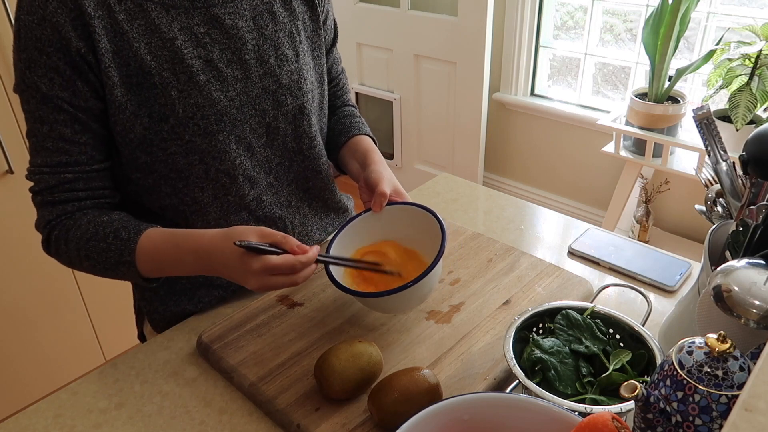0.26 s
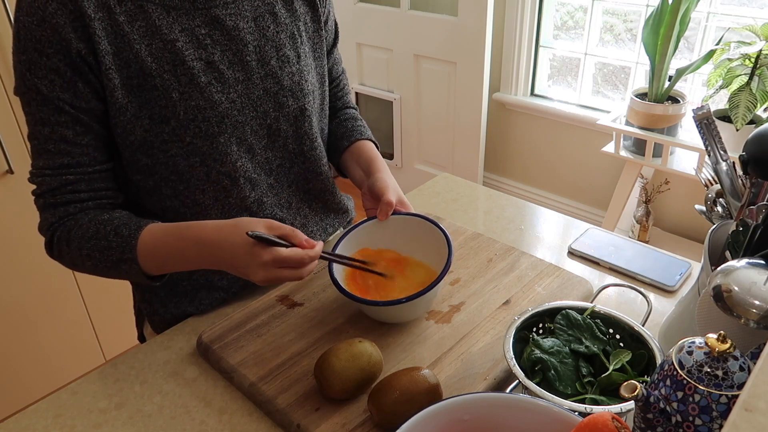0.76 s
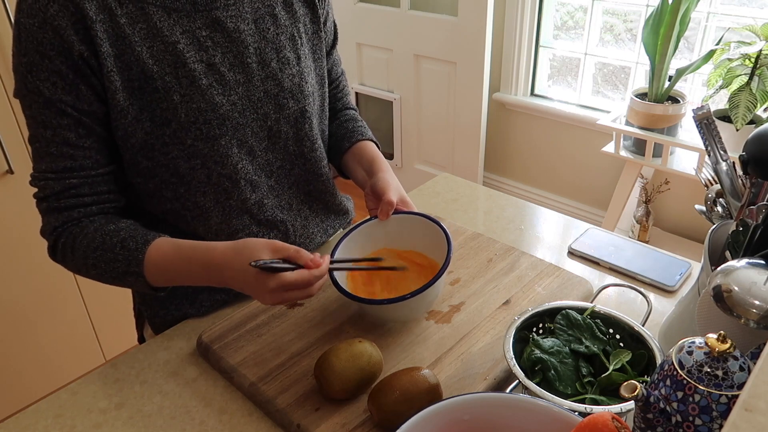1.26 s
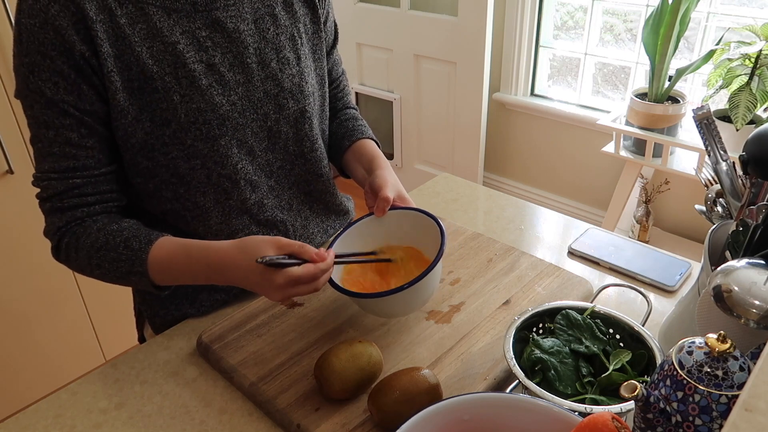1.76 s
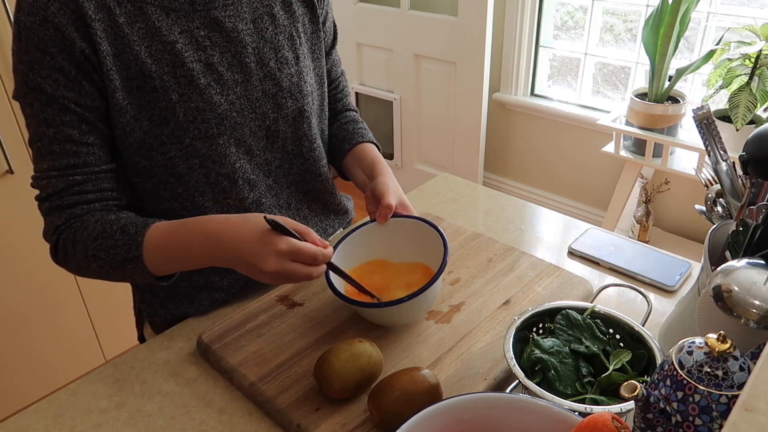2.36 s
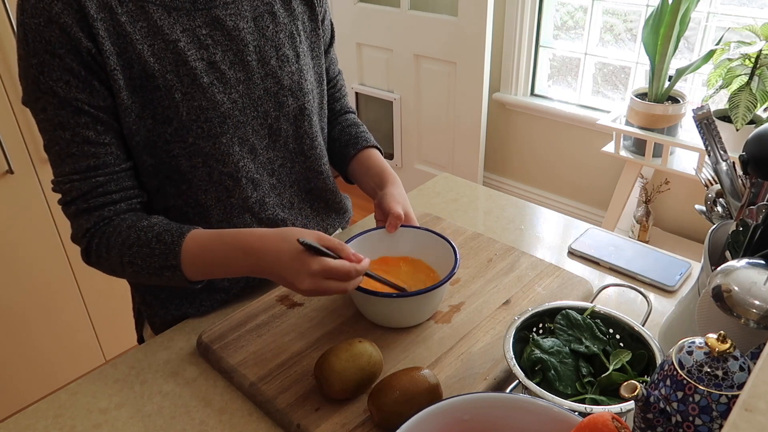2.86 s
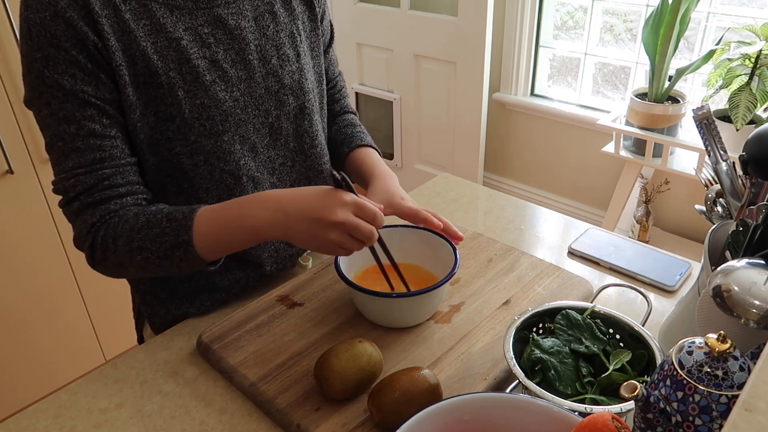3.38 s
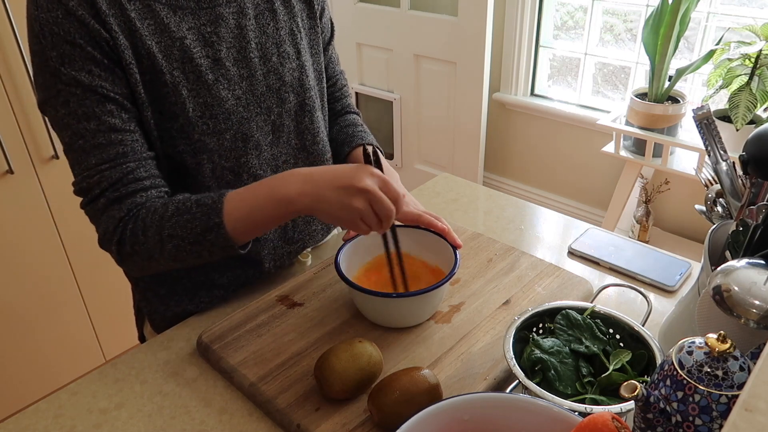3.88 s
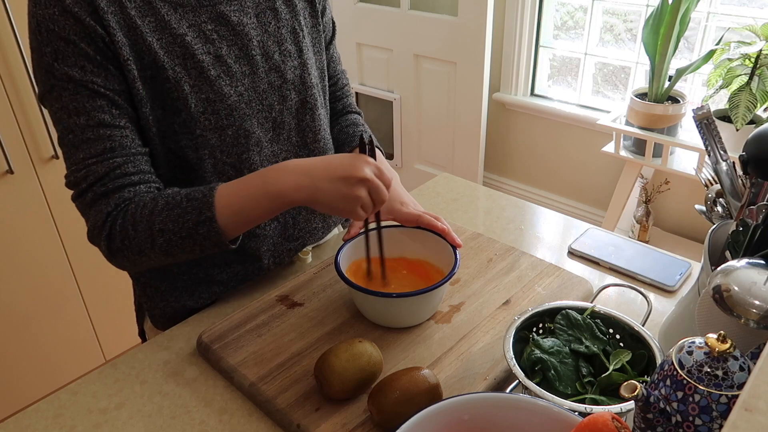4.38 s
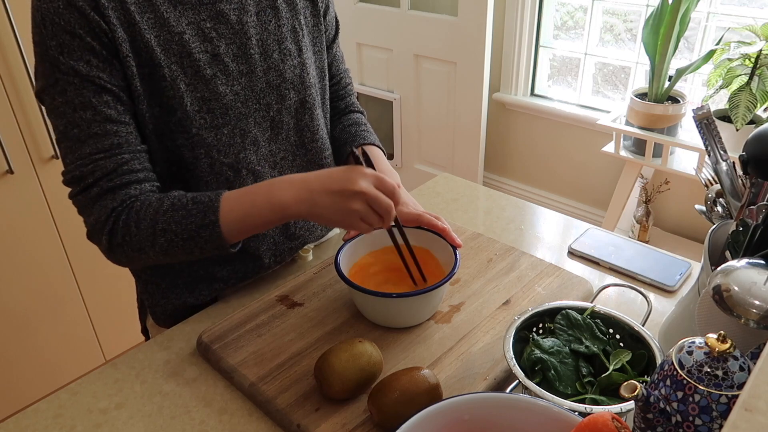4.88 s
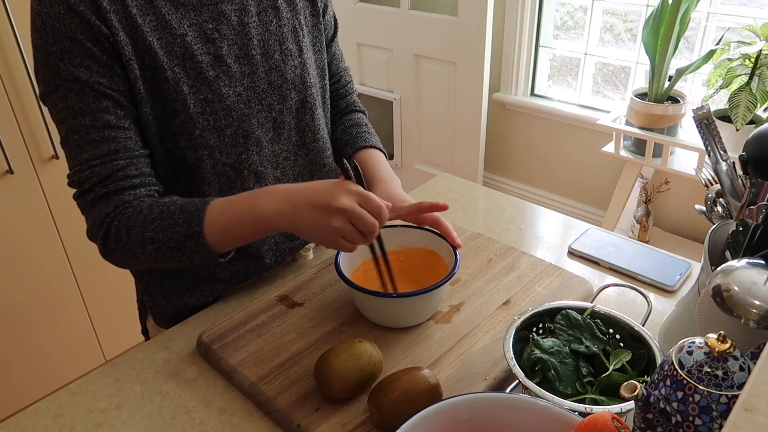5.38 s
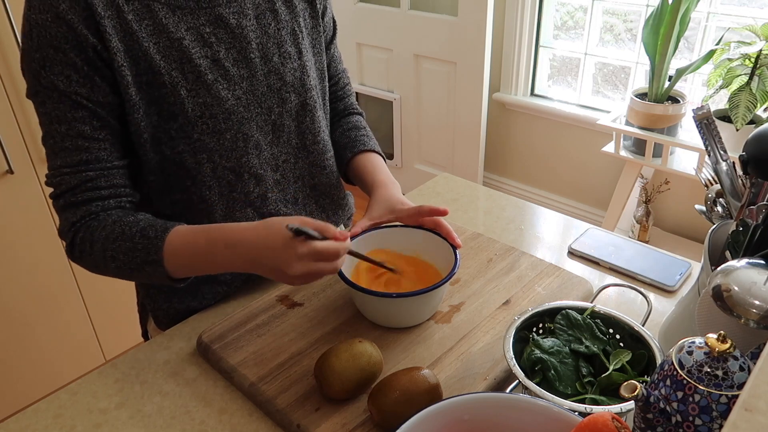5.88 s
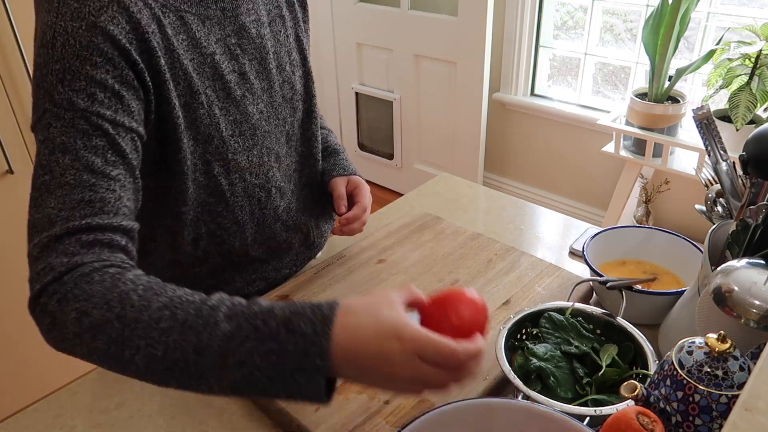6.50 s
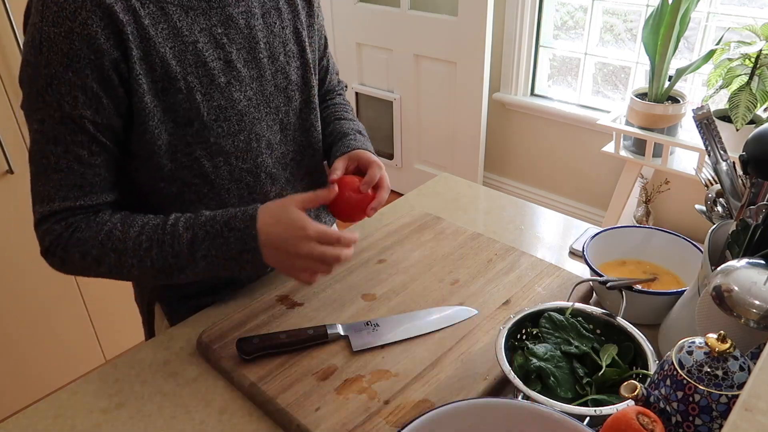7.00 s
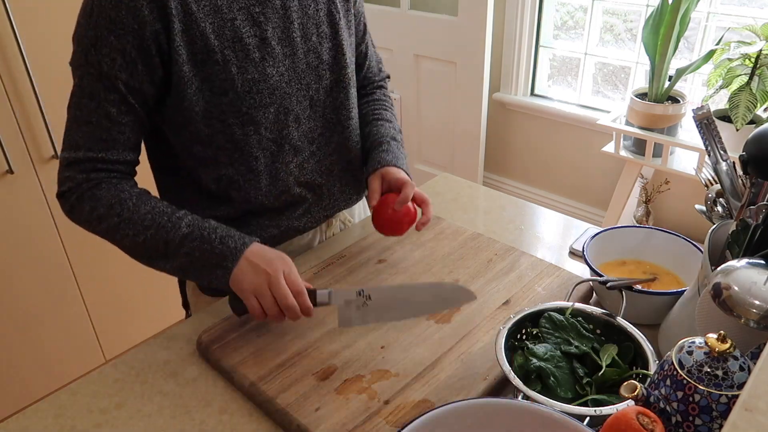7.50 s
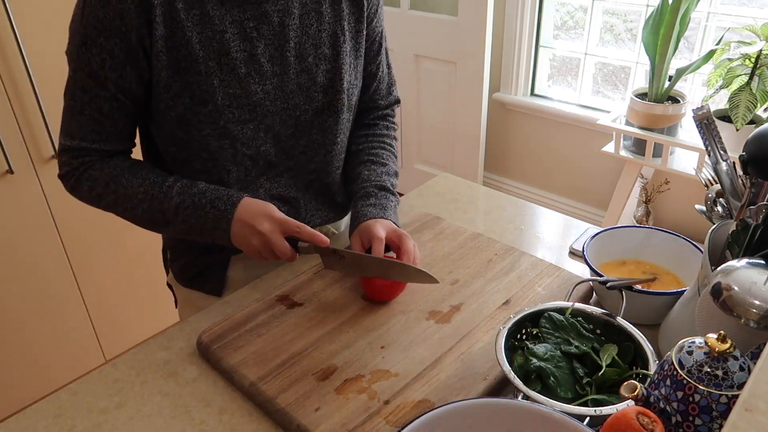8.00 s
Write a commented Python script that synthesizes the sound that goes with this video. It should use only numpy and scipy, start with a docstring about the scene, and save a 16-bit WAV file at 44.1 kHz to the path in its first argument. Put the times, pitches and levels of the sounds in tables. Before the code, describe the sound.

In a small kitchen with a low fridge hum, wooden chopsticks beat egg in an enamel bowl with quick sharp clicks and small wet plops. The bowl thuds hard on a wooden board and is set down; softer, wetter stirring follows. The sticks clatter on the rim, cut abruptly, then sleeves rustle, a knife handle bumps and a blade slides softly into a tomato. Close stereo microphone.

```python
"""A small kitchen: wooden chopsticks beat eggs in an enamel bowl, as struck modes with sharp ticks and plops.
The bowl thuds on a cutting board and is set down; the sticks scrape round in it, then are dropped on the rim.
The scene then jumps ahead: sleeves rustle, a knife is picked up and drawn into a tomato.
Sliding, egg and cloth are filtered grains and bubbles; noise and wavering tones make a fridge hum throughout."""
import sys
import numpy as np
from scipy import signal
from scipy.fft import rfft, irfft, next_fast_len
from scipy.io import wavfile
from scipy.ndimage import map_coordinates

SR = 44100
rng = np.random.default_rng(int(sys.argv[2]) if len(sys.argv) > 2 else 0)


def put_to_file(sound):
    """Save the sound as 16-bit audio at rate SR, in the file named by the first command-line argument."""
    columns = np.atleast_2d(sound).T  # one column per channel
    safe = np.clip(columns, -1, 1)
    whole_steps = np.round(safe * 32767)
    wavfile.write(sys.argv[1], SR, whole_steps.astype(np.int16))


N = 363825
T = np.arange(SR // 2) / SR  # seconds since a blow
CLOCK = np.arange(N) / SR  # seconds since the start
JUMP_S = 6.181  # the scene jumps from the eggs to the knife

# Bowl foot on board. Each row: start in seconds, level in dB, bright edge and low boom in relative dB.
KNOCKS = [(0.7536, -19, -35, -1), (0.789, -23, -6, -8), (1.1305, -3.5, -23, -15),
          (2.3416, -1.5, -15.5, -14.5), (2.4746, -1.5, -14, -12.5), (2.831, -21.5, -37, -2)]
# Spectrum of wood clacking. Each row: frequency in Hz, relative density in dB per Hz.
CLACK = [(100, -41), (280, -22), (520, -33.5), (900, -1.5), (1800, 2.5), (3200, 1), (4200, -14),
         (8000, -17), (16000, -41)]
# Spectrum of hard tips ticking. Each row: frequency in Hz, relative density in dB per Hz.
TICK = [(1000, -21), (3000, 2.5), (4800, 3), (6500, 5), (9500, -2), (12000, 3), (14500, -4), (16000, -29)]
# Spectrum of a thud on the board. Each row: frequency in Hz, relative density in dB per Hz.
THUD = [(20, -32), (60, -38), (170, -22), (350, -18.5), (520, 13), (720, 11.5), (1200, 4.5), (2000, -16.5),
        (4000, -56), (12000, -82)]
# Stereo width of sounds at the counter. Each row: frequency in Hz, side gain in dB.
WIDTH = [(30, -28), (160, -20), (300, -19), (650, -26), (1300, -23), (2800, -15), (5000, -3), (9000, 0),
         (15000, 1)]


def amp(db):
    """Decibels to gain."""
    return 10 ** (np.asarray(db) / 20)


def unit(x):
    """Scale to rms 1."""
    return x / np.sqrt(np.mean(x ** 2) + 1e-20)


def blow(x):
    """Scale a short sound to the energy of one millisecond at full level."""
    return x / np.sqrt(np.sum(x ** 2) * 1000 / SR)


def along(points, hz):
    """Interpolate (Hz, value) points on a log frequency axis."""
    f, v = np.transpose(points)
    return np.interp(np.log(hz + 1), np.log(f + 1), v)


def level(rows):
    """(s, dB) rows as a gain per sample, silent outside them."""
    return amp(np.interp(CLOCK, *np.transpose(rows), left=-120, right=-120))


def wobble(rate_hz):
    """A smooth random curve, rate_hz knots a second."""
    knots = rng.standard_normal(int(N * rate_hz / SR) + 4)
    return map_coordinates(knots, [CLOCK * rate_hz])


def swell(s, half_s):
    """A smooth rise and fall round time s, 1 at its top."""
    return np.exp(-((CLOCK - s) / half_s) ** 2)


def swells_of(rows):
    """Sum of swells from (middle s, dB, half length s) rows, as a gain per sample."""
    return sum(amp(db) * swell(s, half_s) for s, db, half_s in rows)


def filtered(x, response):
    """x times a response of frequency."""
    size = x.shape[-1]
    m = next_fast_len(size + 8192)
    hz = np.fft.rfftfreq(m, 1 / SR)
    return irfft(rfft(x, m) * response(hz), m)[..., :size]


def coloured(x, spectrum):
    """x filtered by the given spectrum, at rms 1."""
    return unit(filtered(x, lambda hz: amp(along(spectrum, hz))))


def spread(pair, width):
    """Two unrelated signals as mid and side become left and right; width sets the side gain by frequency."""
    side = filtered(pair[1], lambda hz: amp(along(width, hz)))
    return np.array([pair[0] + side, pair[0] - side])


def add(track, s, sound):
    """Mix a sound in at time s."""
    start = round(s * SR)
    track[:, start:start + len(T)] += sound[:, :N - start]


def late(x, s):
    """x delayed by s seconds."""
    return np.pad(x, (round(s * SR), 0))[:len(x)]


def pulse(spectrum):
    """One causal push with the given spectrum: minimum phase, by folding the cepstrum."""
    hz = np.fft.rfftfreq(len(T), 1 / SR)
    cepstrum = irfft(np.log(amp(along(spectrum, hz))))
    half = len(T) // 2
    cepstrum[1:half] *= 2
    cepstrum[half:] = 0
    return blow(irfft(np.exp(rfft(cepstrum))))


def ring(modes, scatter_db, detune):
    """Damped (Hz, dB, t60 s) modes whose strength and pitch vary at random from blow to blow."""
    hz, db, t60_s = np.transpose(modes)[:, :, None]
    size, shift = rng.standard_normal((2, len(modes), 1))
    sign = (-1) ** np.arange(len(modes))[:, None]
    fade = amp(db + scatter_db * size - 60 * T / t60_s)
    wave = np.sin(2 * np.pi * hz * (1 + detune * shift) * T)
    return blow(np.sum(sign * fade * wave, axis=0))


def chatter(x, t60_s, rough):
    """A contact is one sharp touch and a brief rattle after it."""
    rattle = rng.standard_normal(len(T)) * np.exp(-np.log(1000) * T / t60_s)
    force = rough * rattle / np.linalg.norm(rattle)
    force[0] += 1
    return blow(signal.fftconvolve(x, force)[:len(T)])


def grains(rate_hz, spiky_db):
    """Two trains of tiny random slips, rate_hz a second."""
    hits = rng.random((2, N)) < rate_hz / SR
    size = rng.standard_normal((2, N)) * amp(spiky_db * rng.standard_normal((2, N)))
    return hits * size


def bubbles(rate_hz, centre_hz, octaves, cycles, spiky_db, rise):
    """Two streams of tiny bubbles, rate_hz a second, each ringing for a few cycles as its pitch rises."""
    t = T[:SR // 70]
    count = int(rate_hz * N / SR)
    streams = []
    for _ in range(2):
        start = rng.integers(0, N, count)
        pitch, size = rng.standard_normal((count, 2)).T[:, :, None]
        age = centre_hz * 2 ** (octaves * pitch) * t / cycles
        wave = np.sin(2 * np.pi * cycles * age * (1 + rise * age / 2))
        wave = amp(spiky_db * size) * wave * age * np.exp(-2 * age)
        wave = wave * (1 - t / t[-1])  # end at zero
        place = start[:, None] + np.arange(len(t))
        streams.append(np.bincount(place.ravel(), wave.ravel(), N)[:N])
    return unit(np.array(streams))


def tone(hz, waver_rad):
    """A hum line of rms 1 with an unsteady phase."""
    return np.sqrt(2) * np.sin(2 * np.pi * hz * CLOCK + waver_rad * wobble(25))


def tail(early_db, early_s):
    """The kitchen's answer: dense echoes off the counter and cupboards, then an even decay."""
    # Each row: frequency in Hz, t60 in s.
    kitchen = [(150, 0.71), (700, 0.5), (1500, 0.52), (3500, 0.58), (9000, 0.37), (15000, 0.012)]
    hz, t, z = signal.stft(rng.standard_normal((2, len(T))), SR, nperseg=256)
    decay = np.exp(-np.log(1000) * t / along(kitchen, hz)[:, None])
    x = signal.istft(z * decay, SR, nperseg=256)[1][:, :len(T)]
    x = x * (1 + amp(early_db) * np.exp(-T / early_s))
    x = x * (1 - np.exp(-T / 0.00049))  # soft onset
    return spread(x / np.linalg.norm(x[0]), WIDTH)


def in_room(x, wet_db):
    """A blow heard directly and through the kitchen."""
    echoes = signal.fftconvolve(x[None], tail(early_db=0.5, early_s=0.031), axes=1)[:, :len(T)]
    return x + amp(wet_db) * echoes


def in_room_steady(pair, wet_db):
    """A lasting sound heard directly and through the kitchen."""
    echoes = signal.fftconvolve(pair[:1], tail(early_db=18.0, early_s=0.003), axes=1)[:, :N]
    return spread(pair, WIDTH) + amp(wet_db) * echoes


def chopsticks():
    """Each stroke clacks the sticks and rings the bowl; the tips tick on the enamel, one just after the other."""
    # Each row: start in seconds, relative clack level in dB, bowl note in Hz, relative bowl ring in dB,
    # stick note in Hz (it depends on the grip), relative tick level in dB.
    clicks = [(0.0838, -25.5, 1050, -3.5, 1770, -9.5), (0.268, -31, 936, -0.5, 2050, -10),
              (0.4389, -24, 1027, -5, 1720, -12.5), (0.6089, -19.5, 1110, -14, 1906, -14),
              (0.787, -20, 1010, -10, 1804, -15), (0.946, -20, 940, -5.5, 1920, -17.5),
              (0.9923, -25.5, 980, -21, 1770, -14), (1.1156, -19.5, 1120, -11, 1840, -16.5),
              (1.238, -27, 980, -3.5, 1820, -23), (1.287, -23.5, 1000, -27, 1816, -18.5),
              (1.4508, -24.5, 963, -10.5, 1800, -12.5), (1.6229, -21.5, 1023, -12, 1827, -12),
              (1.791, -22.5, 1050, -10, 1770, -12.5), (1.95, -32, 956, -4, 1790, -3),
              (2.0094, -25, 1180, -5.5, 1740, -9.5), (2.1159, -33, 960, -4.5, 1770, -6.5),
              (2.302, -30.5, 980, -16, 1770, -9), (2.345, -36.5, 1000, -2, 1820, -2),
              (2.434, -28, 1010, 5, 1780, -19.5), (2.8051, -28.5, 1010, -16, 1840, -17),
              (2.972, -30.5, 1000, -23, 1780, -20), (3.04, -23, 797, -18, 1840, -17.5),
              (3.123, -21.5, 1270, -11, 1865, -10), (3.321, -20.5, 858, -13, 1730, -17),
              (3.501, -22, 910, -0.5, 1810, -30), (3.664, -37, 885, 4, 1600, -24),
              (3.808, -40, 970, 2.5, 1820, -20), (4.01, -28, 1125, -4, 1770, -35),
              (4.059, -34, 1090, -16, 1840, -34), (4.118, -28, 965, -2, 1820, -37),
              (4.217, -37, 990, -4, 1810, -32), (4.329, -27.5, 850, -9, 2080, -37),
              (4.456, -32, 1010, -16, 2070, -29), (4.5378, -28, 856, -10, 2030, -40),
              (4.568, -27.5, 1020, -14, 1960, -22), (4.771, -28, 985, -4, 1830, -28),
              (4.887, -36, 1000, -11, 1970, -38), (5.001, -25, 920, -6.5, 1960, -11),
              (5.186, -31, 1000, -7, 1910, -27), (5.215, -25.5, 960, -9.5, 1704, -12),
              (5.377, -37, 963, 5, 1830, -30), (5.408, -44, 1000, -12, 1800, -4.5),
              (5.434, -29, 964, -5.5, 1960, -21), (5.6373, -32, 950, 0, 2000, 3.5),
              (5.6649, -22, 1130, -7, 2010, -17), (5.8421, -33.5, 980, -8, 1850, 5),
              (5.8781, -18, 1052, -2.5, 1985, -21)]
    # Bowl modes. Each row: multiple of the bowl note, relative level in dB, t60 in s.
    bowl = [(1, 8, 0.048), (1.13, 3, 0.042), (.85, 3, 0.041)]
    # Fixed stick modes. Each row: nominal frequency in Hz, relative level in dB, t60 in s.
    sticks = [(1620, -7.5, 0.064), (1787, -6, 0.079), (2043, 9, 0.02), (2834, -4, 0.018),
              (2967, 4.5, 0.026), (3160, -4.5, 0.033), (4410, -6, 0.036), (6190, -13, 0.047)]
    # Bowl standing on the board. Each row: nominal frequency in Hz, relative level in dB, t60 in s.
    foot = [(309, 3.5, 0.1), (393.6, 2.5, 0.1), (730, 2.5, 0.032), (792, 4, 0.087), (1100, -2, 0.047),
            (1720, -1, 0.056), (2050, 13, 0.043), (3410, 4, 0.026)]
    out, clack, tick = np.zeros((2, N)), pulse(CLACK), pulse(TICK)
    for s, db, note_hz, ring_db, stick_hz, tick_db in clicks:
        modes = [(stick_hz, 10, 0.039), *sticks]
        rattle = amp(-3.5) * chatter(clack, t60_s=0.011, rough=0.77)
        wood = blow(ring(modes, scatter_db=2.5, detune=0.019) + rattle)
        wall = ring(np.array(bowl) * [note_hz, 1, 1], scatter_db=4.0, detune=0.0071)
        body = wood + amp(ring_db + 2.5) * wall
        if s > KNOCKS[-1][0]:  # once the bowl stands on the board, strokes pass through its foot
            body = body + amp(-4.5) * ring(foot, scatter_db=0.5, detune=0.0096)
        first_tip = chatter(tick, t60_s=0.013, rough=6.7)
        second_tip = chatter(tick, t60_s=0.00093, rough=3.5)
        tips = first_tip + 0.73 * late(second_tip, rng.uniform(0.0049, 0.0073))
        hit = in_room(body, wet_db=1.0) + amp(tick_db + 3.5) * in_room(tips, wet_db=-1.0)
        add(out, s, amp(db - 1.5) * hit)
    return out


def plops():
    """Air pockets dragged under by the sticks ring briefly, gliding as they open or close, and throw up a splash."""
    # Each row: start in seconds, relative level in dB, final pitch in Hz, life in s (to 1/e),
    # share by which the pitch starts higher, splash over the pocket in dB.
    pockets = [(0.049, -32, 1130, 0.012, 0.045, -2.5), (0.225, -26, 1202, 0.0089, 0.086, -14),
               (0.525, -38, 1336, 0.008, -0.083, -5), (0.554, -23.5, 1380, 0.01, 0.017, -2.5),
               (0.557, -27, 1930, 0.0057, 0.1, -22), (0.567, -24.5, 1730, 0.006, -0.031, -13),
               (0.568, -38, 2480, 0.003, -0.05, -13), (0.718, -42, 2920, 0.0022, -0.029, -5),
               (1.079, -37.5, 2500, 0.0031, 0.019, -16), (1.6949, -10, 957, 0.024, 0.17, -21),
               (1.921, -31, 1390, 0.0051, 0.13, -2), (2.269, -35, 2690, 0.0023, -0.039, -6)]
    # Thrown egg. Each row: frequency in Hz, relative density in dB per Hz.
    splash_spectrum = [(300, -59), (900, -3.5), (1400, 0.5), (2400, -2.5), (3600, -11), (8000, -32),
                       (16000, -78)]
    glide_s = 0.005  # how fast a pocket settles on its pitch
    out = np.zeros((2, N))
    for s, db, hz, life_s, glide, splash_db in pockets:
        pitch_hz = hz * (1 + glide * np.exp(-T / glide_s))
        wave = np.sin(2 * np.pi * np.cumsum(pitch_hz) / SR)
        bubble = blow(wave * np.exp(-T / life_s) * (1 - np.exp(-T / 0.0008)))
        splash = chatter(pulse(splash_spectrum), t60_s=0.015, rough=0.58)
        splash = splash + amp(-14.5) * chatter(pulse(TICK), t60_s=0.06, rough=1.0)
        plop = in_room(bubble, wet_db=-5.0) + amp(splash_db) * in_room(splash, wet_db=3.0)
        add(out, s, amp(db + 3.5) * plop)
    return out


def bowl_knocks():
    """The bowl's foot thuds on the board in quick touches, with a bright edge and a boom, and rings standing waves."""
    # Board modes. Each row: nominal frequency in Hz, relative level in dB, t60 in s.
    board = [(402, -8, 0.06), (603, -12, 0.04), (691, -3, 0.031), (727, 4, 0.042), (820, -4.5, 0.059),
             (1050, 3.5, 0.062), (1213, -1.5, 0.086), (1540, -34, 0.073), (1930, -17.5, 0.039)]
    # Standing waves between counter and cupboards. Each row: nominal frequency in Hz, relative dB, t60 in s.
    standing = [(315, -28, 0.21), (363, -15, 0.23), (458, -14, 0.42), (587, -9, 0.38), (708, 5, 0.56),
                (738, -2, 0.53), (776, -7, 0.51), (786, -10, 1), (866, -10, 0.49), (1020, -22, .45),
                (1080, -15.5, 0.79), (1123, -13.5, 0.67), (1215, -20, 0.57), (1460, -16, 0.88)]
    # Low boom. Each row: nominal frequency in Hz, relative level in dB, t60 in s.
    boom_modes = [(123, -12.5, 0.07), (206.5, -7, 0.1), (272, -2, 0.049), (397, 2.5, 0.08),
                  (489, -1, 0.026)]
    # Bright edge. Each row: frequency in Hz, relative density in dB per Hz.
    edge_spectrum = [(400, -6.5), (1200, 9), (1700, 4), (2250, 2), (3500, -21), (6000, -34), (9000, -63),
                     (11500, -44), (14000, -40), (16500, -73)]
    out, thud = np.zeros((2, N)), pulse(THUD)
    for s, db, edge_db, boom_db in KNOCKS:
        touches = 1.25 * thud + 1.07 * late(thud, 0.002713) + 0.47 * late(thud, 0.0068)
        body = blow(ring(board, scatter_db=5.0, detune=0.0089) + amp(-0.5) * touches)
        hang = amp(-0.5) * ring(standing, scatter_db=0.5, detune=0.0012)
        hang = hang * (1 - np.exp(-T / 0.007))  # the waves take time to build
        boom = amp(boom_db) * ring(boom_modes, scatter_db=5.0, detune=0.0036)
        edge = amp(edge_db + 6.0) * chatter(pulse(edge_spectrum), t60_s=0.0067, rough=1.0)
        knock = in_room(body, wet_db=-4.0) + hang
        knock = knock + in_room(boom, wet_db=-0.5) + in_room(edge, wet_db=-2.5)
        add(out, s, amp(db) * knock)
    # the knocks carry no deep bass
    return signal.sosfilt(signal.butter(2, 75, "high", fs=SR, output="sos"), out)


def rim():
    """The enamel rim clanks, buzzes and rings on as the bowl settles."""
    # Each row: start in seconds, relative level in dB.
    hits = [(2.604, -21.5)]
    # Rim modes. Each row: nominal frequency in Hz, relative level in dB, t60 in s.
    rim_modes = [(2600, -2, 0.18), (2690, 8, 0.23), (2748, 7, 0.23), (2939, -5, .16), (3450, 10, 0.18),
                 (3500, -1, 0.13), (3941, -9, .25), (4296, -1.5, 0.19), (4650, -12, .15), (4735, -9, .25),
                 (4900, -6, 0.15), (5206, -12, .15), (7400, -8, 0.25)]
    # Buzz. Each row: frequency in Hz, relative density in dB per Hz.
    clank = [(500, -28), (1500, 4.5), (2700, -2.5), (3400, -1), (3800, -12), (4700, -1.5), (5500, -16.5),
             (7500, -17), (12000, -28), (16000, -37)]
    out = np.zeros((2, N))
    for s, db in hits:
        metal = chatter(ring(rim_modes, scatter_db=4.0, detune=0.0017), t60_s=0.012, rough=0.5)
        buzz = chatter(pulse(clank), t60_s=0.11, rough=3.1)
        hit = in_room(amp(3) * metal, wet_db=-5) + in_room(amp(3.5) * buzz, wet_db=1.0)
        add(out, s, amp(db) * hit)
    return out


def stirring():
    """The tips slide round the bowl; each sweep drives a wet surge and a froth of small bubbles through the egg."""
    # Sweeps. Each row: middle in seconds, relative level in dB, half length in s.
    sweep_rows = [(3.596, -44.5, 0.021), (3.692, -46, 0.014), (3.858, -39, 0.045), (4.06, -34, 0.013),
                  (4.27, -34.5, 0.043), (4.5, -38.5, 0.058), (4.688, -35.5, 0.025), (4.911, -33, 0.03),
                  (5.323, -35, 0.0071), (5.447, -44, 0.0068), (5.526, -39, 0.016)]
    # Churning between sweeps. Each row: time in seconds, relative level in dB.
    churn_rows = [(3.5, -73), (3.78, -54), (3.9, -54.5), (4.2, -51.5), (4.4, -47), (4.7, -57),
                  (5.04, -47.5), (5.15, -66), (5.3, -60), (5.5, -58), (5.6, -75)]
    # Sliding tips. Each row: frequency in Hz, relative density in dB per Hz.
    scrape = [(150, -18), (350, -2), (520, -9), (680, -5.5), (850, 1), (1300, -6), (1900, 3), (2300, -6),
              (2700, -7), (3100, -4), (3800, -16), (5000, -17), (8000, -30.5), (12500, -32), (15500, -41)]
    # Egg rushing round the sticks. Each row: frequency in Hz, relative density in dB per Hz.
    surge_spectrum = [(300, -25), (650, -3.5), (1000, 4.5), (1500, 0.5), (2200, 4.5), (3100, -36),
                      (4000, -12), (8000, -30), (15000, -43)]
    slop_db, churn_swing_db = -56, 2.0  # egg slopping all along; unsteadiness of the churning
    clump_db, clump_rate_hz = 3.0, 150  # the egg tears in clumps
    churn = (amp(slop_db) + level(churn_rows)) * amp(churn_swing_db * wobble(18))
    slips = coloured(grains(rate_hz=1500, spiky_db=0.5), scrape)
    surge = coloured(grains(rate_hz=1100, spiky_db=2.5), surge_spectrum)
    froth = bubbles(rate_hz=700, centre_hz=1680, octaves=.36, cycles=6, spiky_db=2, rise=.08)
    clumps = unit(amp(clump_db * np.tanh(2 * wobble(clump_rate_hz))))
    egg = swells_of(sweep_rows) * clumps * (amp(-5.5) * surge + amp(-3.0) * froth)
    return in_room_steady(egg + churn * (slips + amp(-9.5) * froth), wet_db=-0.5)


def fizzes():
    """Strings of egg tear off the lifted sticks; their thin films burst in a brief, fine crackle."""
    # Each row: middle in seconds, level in dB, half length in s.
    tears = [(0.38, -66, 0.013), (0.504, -51, 0.0062), (0.91, -50, 0.01)]
    # Each row: frequency in Hz, relative density in dB per Hz.
    fizz = [(1500, -32), (3800, -4), (5400, 7), (7500, -1), (11000, -12), (15500, -30)]
    crackle = coloured(grains(rate_hz=2600, spiky_db=6), fizz)
    return in_room_steady(crackle * swells_of(tears), wet_db=7.5)


def dropped_sticks():
    """Let go, the sticks bounce on the rim and shake bowl and board; no longer held, they ring freely."""
    # Each row: start in seconds, level in dB, relative free ring in dB.
    drops = [(6.046, -27.5, -24.5), (6.0555, -14.5, 0), (6.065, -21, -18), (6.084, -35, -8),
             (6.1192, -30.5, 9.5), (6.127, -31, -6)]
    # Sticks, bowl and board shaken. Each row: nominal frequency in Hz, relative level in dB, t60 in s.
    clatter = [(256, -5, 0.065), (420, -9, 0.033), (580, -6, 0.083), (920, -2, 0.013), (1090, -6.5, 0.088),
               (1560, 7.5, 0.013), (1835, 3, 0.032), (1897, 6.5, 0.022), (3150, -12, 0.023)]
    # A free stick. Each row: nominal frequency in Hz, relative level in dB, t60 in s.
    free_stick = [(2650, -4, 0.025), (2960, 1, 0.032), (3210, 7.5, 0.022), (4000, -3, 0.017),
                  (4710, -4.5, 0.027)]
    out = np.zeros((2, N))
    for s, db, free_db in drops:
        wood = ring(clatter, scatter_db=0.5, detune=0.016)
        wood = wood + amp(-6.5) * chatter(pulse(CLACK), t60_s=0.051, rough=2.8)
        free = amp(free_db + 2) * ring(free_stick, scatter_db=2, detune=.004)
        tips = amp(-10.0) * chatter(pulse(TICK), t60_s=0.0081, rough=8.9)
        add(out, s, amp(db) * (in_room(wood + tips, wet_db=1.5) + in_room(free, wet_db=-5.5)))
    return out


def knife():
    """Sleeves rustle as fine grains, the handle bumps the board and the blade pings faintly, as struck modes."""
    # Rustles. Each row: middle in seconds, relative level in dB, half length in s.
    rubs = [(6.873, -62, 0.13), (7.63, -68.5, 0.51)]
    # Cloth. Each row: frequency in Hz, relative density in dB per Hz.
    swish = [(300, 17.5), (700, 11.5), (1500, 5), (3000, 2.5), (5000, -11), (8000, -19), (14000, -59)]
    # Handle on board. Each row: start in seconds, level in dB.
    bumps = [(7.283, -25.5), (7.288, -24)]
    # Handle modes. Each row: nominal frequency in Hz, relative level in dB, t60 in s.
    handle = [(140, -3, 0.082), (260, 4, 0.059), (448, 0.5, 0.078), (654, -8, 0.036), (678, 4.5, 0.075),
              (900, -4, 0.096), (1350, -5, 0.026), (1880, -4, 0.031), (2460, -3, 0.0076)]
    # Blade pings. Each row: start in seconds, level in dB.
    blade_hits = [(7.775, -36)]
    # Blade modes. Each row: nominal frequency in Hz, relative level in dB, t60 in s.
    blade = [(2730, 0, 0.042), (3060, 0, 0.054)]
    rubbing = amp(-60.5) * (CLOCK > JUMP_S) + swells_of(rubs)  # cloth moves all the while after the jump
    cloth = coloured(grains(rate_hz=7200, spiky_db=1.5), swish)
    out = in_room_steady(cloth * rubbing, wet_db=0.5) * amp(4.0)
    for s, db in bumps:
        bump = ring(handle, scatter_db=3.5, detune=0.011)
        bump = bump + 0.36 * chatter(pulse(THUD), t60_s=0.011, rough=2.3)
        add(out, s, amp(db) * in_room(bump, wet_db=0.5))
    for s, db in blade_hits:
        ping = ring(blade, scatter_db=5, detune=0.0015)
        add(out, s, amp(db) * in_room(ping, wet_db=2.5))
    return out


def slicing():
    """The edge saws through the tomato skin in a stream of tiny slips."""
    # Each row: middle in seconds, level in dB, half length in s.
    slices = [(7.795, -57, 0.046), (7.91, -52, 0.063)]
    # Steel on skin. Each row: frequency in Hz, relative density in dB per Hz.
    skin = [(300, -4), (900, 1), (1800, 2), (3000, 1), (4500, -6.5), (6000, -13), (9000, -22), (15000, -45)]
    slips = coloured(grains(rate_hz=2600, spiky_db=1.5), skin)
    return in_room_steady(slips * swells_of(slices), wet_db=-1.0)


def fridge():
    """Steady room air as shaped noise, the compressor's hum lines and the wavering, swelling tone of the fan."""
    # Room air. Each row: frequency in Hz, relative density in dB per Hz.
    air_spectrum = [(15, -48), (30, -20), (50, -2.5), (117, -10), (149, -5), (293, -7), (394, -10),
                    (427, -13.5), (695, -22), (962, -23.5), (1100, -24), (3080, -29), (3340, -16.5),
                    (3620, -26.5), (9000, -35.5), (13200, -46.5), (16000, -80)]
    # Room air comes from all round. Each row: frequency in Hz, side gain in dB.
    air_width = [(30, -36), (90, -17), (170, -11), (350, -2.5), (700, 4.5), (1500, 3.5), (3000, -0.5),
                 (6000, 5.5)]
    # Compressor. Each row: frequency in Hz, nominal level in dB rms.
    hum_lines = [(102.3, -62), (145.3, -69), (247.6, -61)]
    # Fan swells. Each row: middle in seconds, nominal level in dB, half length in s.
    fan_swells = [(0.04, -56, 0.13), (3.85, -50.5, 0.27), (4.208, -47, 0.09), (5.492, -51.5, 0.25),
                  (6.223, -54.5, 0.12), (7.6, -53, 0.18), (8.203, -55, 0.11)]
    hum_swing_db, fan_swing_db, fan_rest_db = 1.5, 1.5, -64
    noise = coloured(rng.standard_normal((2, N)), air_spectrum)
    air = amp(-53.5) * spread(noise, air_width)
    hum = sum(amp(db + hum_swing_db * wobble(5.6)) * tone(hz, waver_rad=.6) for hz, db in hum_lines)
    fan_level = amp(fan_rest_db) + swells_of(fan_swells)
    fan = fan_level * amp(fan_swing_db * wobble(20)) * tone(hz=396, waver_rad=.9)
    return air + hum + fan


def scene():
    """The egg beating stops dead where the scene jumps ahead to the knife; the fridge runs throughout."""
    fade_s = 0.004
    eggs = chopsticks() + plops() + bowl_knocks() + rim() + stirring() + fizzes() + dropped_sticks()
    before_jump = np.clip(.5 + (JUMP_S - CLOCK) / fade_s, 0, 1)
    return eggs * before_jump + knife() + slicing() + fridge()


def record(dry):
    """Round off the loudest peaks, then cut steeply above the band limit."""
    top_hz = 15900
    rounded = dry / (1 + np.abs(dry / .95) ** 8) ** (1 / 8)
    return filtered(rounded, lambda hz: 1 / (1 + (hz / top_hz) ** 80))


dry = scene()
out = record(dry)
put_to_file(out)
```